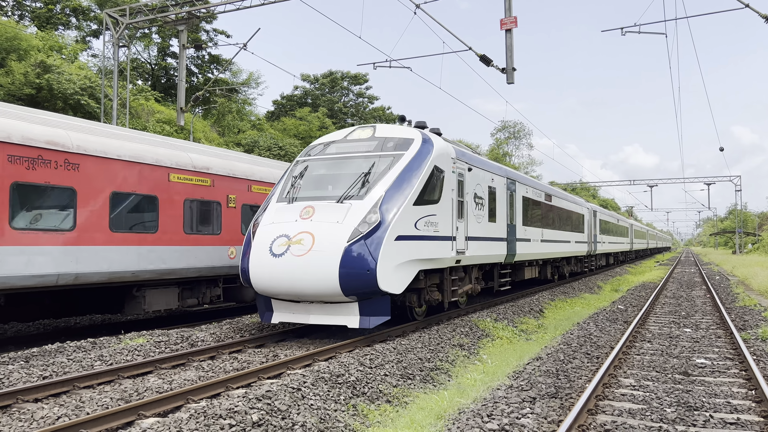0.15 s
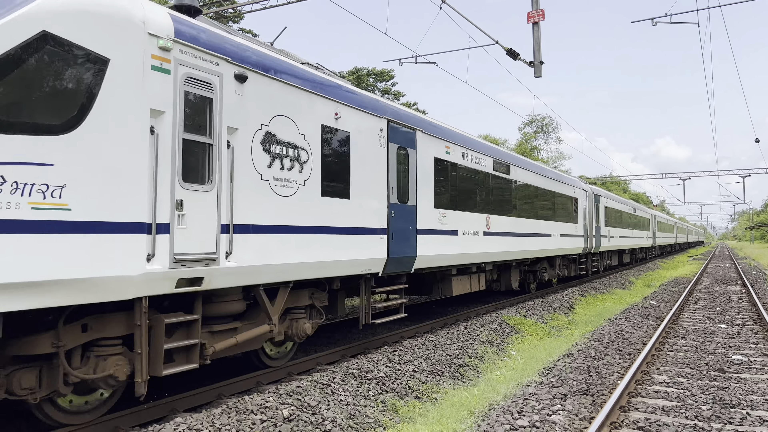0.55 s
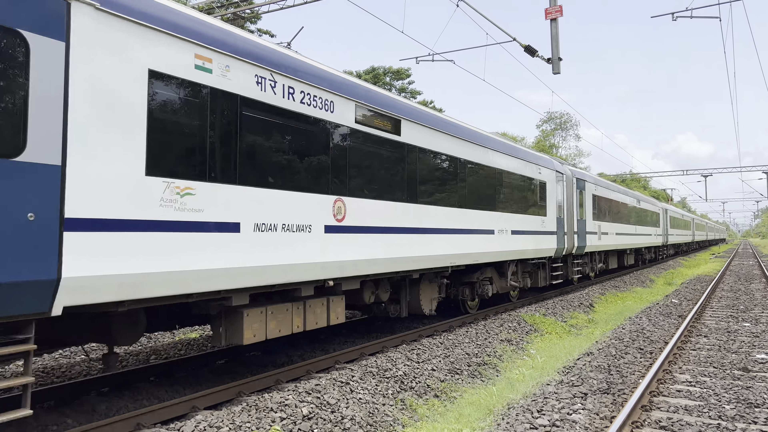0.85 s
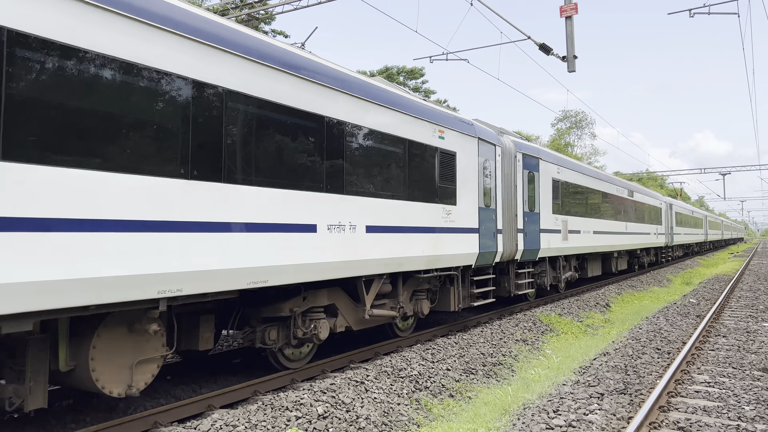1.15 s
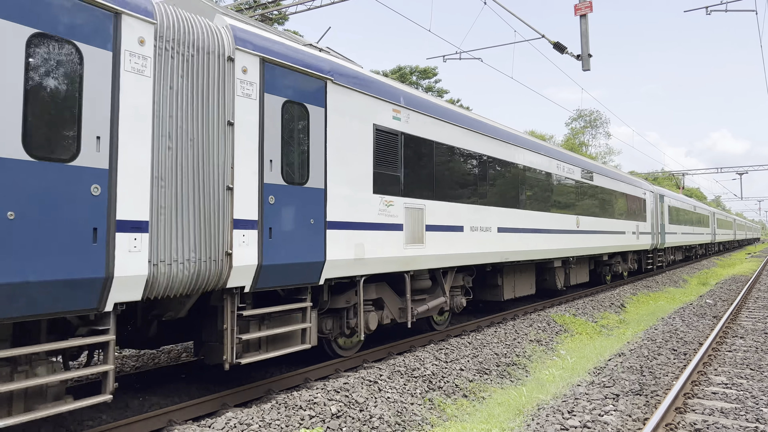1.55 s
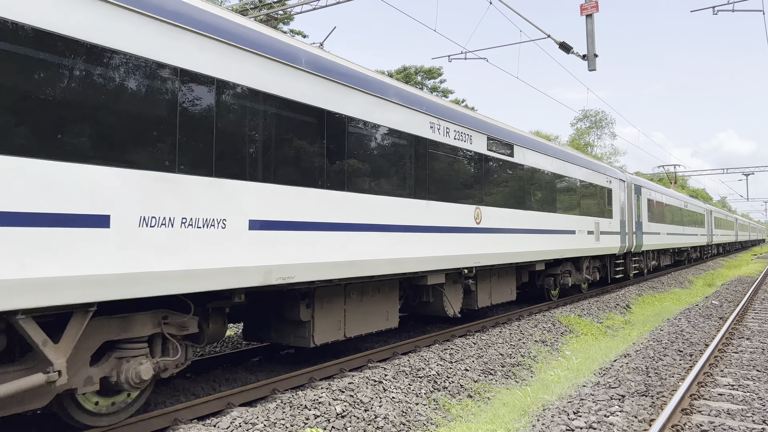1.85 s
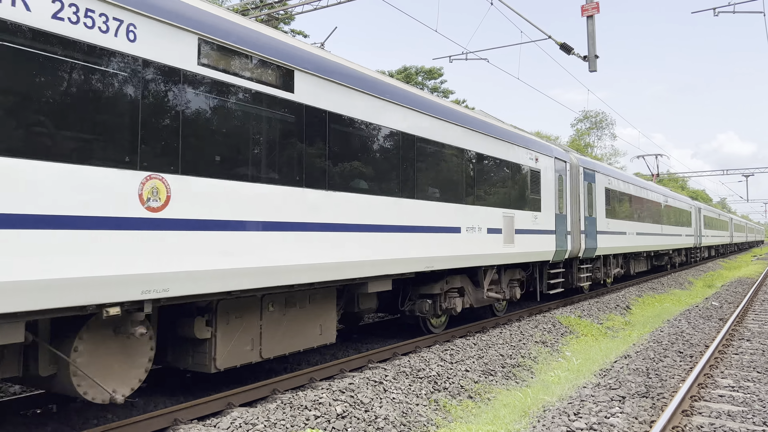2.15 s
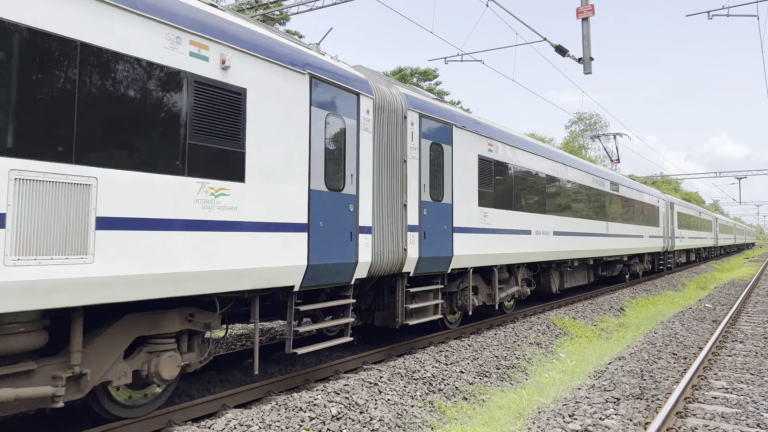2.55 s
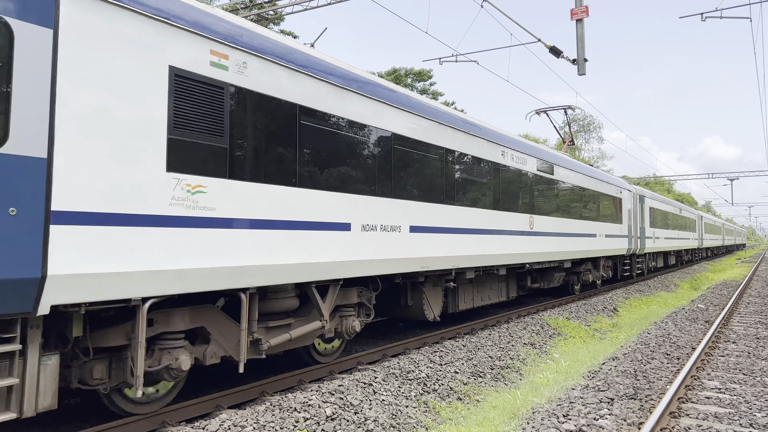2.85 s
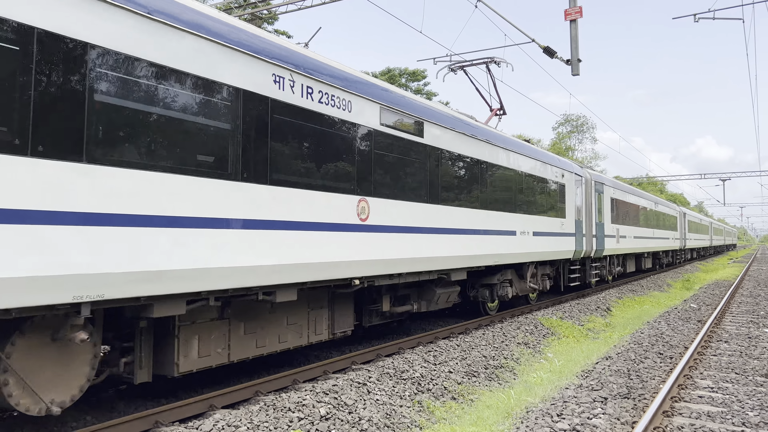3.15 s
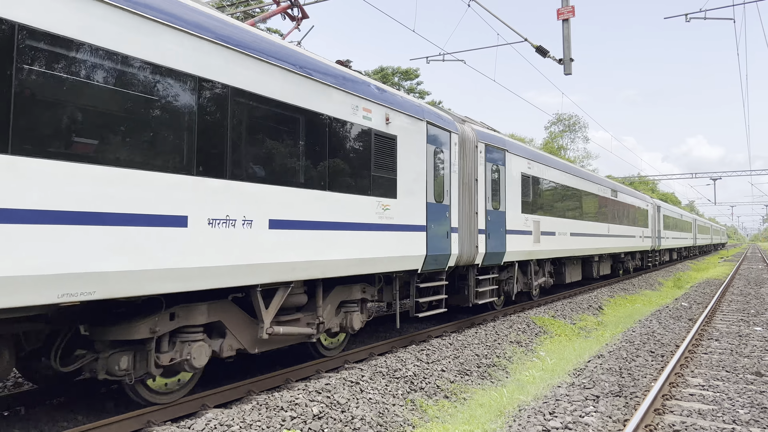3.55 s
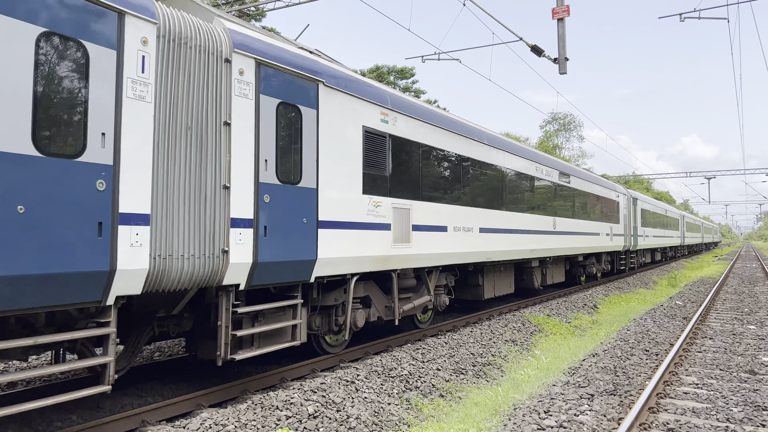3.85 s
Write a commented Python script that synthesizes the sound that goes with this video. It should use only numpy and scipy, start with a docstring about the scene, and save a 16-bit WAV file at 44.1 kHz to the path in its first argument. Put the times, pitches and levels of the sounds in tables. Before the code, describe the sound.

A fast passenger train sweeps by at trackside, rumbling and roaring with sharp repeated double wheel clacks

```python
"""An electric express rushes past a few metres from a phone on the ballast: wheels roar, coaches rumble.
Rolling sound is shaped, patchy noise. Each axle thuds over a rail joint (damped modes, noise bursts),
then clacks on a second gap, which sets the steel wheel ringing. Bogies sweep by as falling chirps.
Behind lie thin squeaks, knocks and ringing down the rails, a low two-tone drone and wavering hums.
The sound comes from the left and reaches the left microphone first."""
import sys
import numpy as np
from scipy import signal
from scipy.fft import rfft, irfft, next_fast_len
from scipy.io import wavfile
from scipy.ndimage import uniform_filter1d, map_coordinates

SR = 44100
rng = np.random.default_rng(int(sys.argv[2]) if len(sys.argv) > 2 else 0)


def store_pcm(level_fs):
    """Save levels as 16-bit WAV."""
    pcm = np.round(np.clip(level_fs, -1, 1) * 32767).astype(np.int16)
    wavfile.write(sys.argv[1], SR, np.atleast_2d(pcm).T)


N = 176400

# Train drawing level. Each row: time in s, then nominal rumble, roar and hiss levels in dB.
PASS_LEVELS = [(0, -52, -44.5, -56.5), (.38, -50, -41.5, -51), (.5, -43, -36.5, -47),
               (.75, -35, -34, -40.5), (1.15, -33, -32.5, -40.5), (1.4, -35, -28.5, -38.5),
               (1.85, -31, -31, -36), (2.35, -31, -28, -38), (2.55, -33.5, -28.5, -37.5),
               (2.85, -29.5, -26.5, -35.5), (3.02, -32, -31, -37), (3.25, -29, -30.5, -37),
               (3.52, -31.5, -30.5, -39.5), (3.75, -33.5, -27.5, -36.5), (4, -30, -28.5, -34)]
# Noise spectra of the rolling train. Each row: frequency in Hz, relative level in dB.
RUMBLE_SPECTRUM = [(25, -56), (42, -19), (52, -9), (62, -4), (76, -5), (95, -8.5), (120, -11.5), (160, -18),
                   (300, -79)]
ROAR_SPECTRUM = [(50, -58), (120, -10), (200, -2), (300, -2.5), (400, -2.5), (520, -5.5), (760, -1.5),
                 (1000, -2), (1300, -11.5), (1800, -20.5), (4000, -53)]
HISS_SPECTRUM = [(600, -28), (1150, -4), (1400, -3.5), (1700, -2), (2500, -2), (3100, -9), (4000, -11),
                 (4900, -5.5), (5400, -15.5), (6200, -11), (7500, -20.5), (9000, -15), (10300, -33.5),
                 (11700, -21.5), (15000, -30.5)]
# Axles at the joint. Each row: time in s, then base levels in dB of thud, crack,
# snap at the second gap, clatter, wheel ring.
AXLES = [(.7965, -11, -22, -20.5, -21.5, -35), (.926, -11.5, -25, -17, -23, -37),
         (1.512, -8, -18, -14, -19.5, -52), (1.6417, -9, -19.5, -15.5, -19, -42),
         (1.9504, -9, -19.5, -19, -20, -24), (2.0795, -7.5, -19.5, -10, -20.5, -29.5),
         (2.667, -9.5, -21, -15.5, -19, -30), (2.7976, -9.5, -21, -13, -24, -31),
         (3.106, -7.5, -17, -17.5, -20, -36), (3.236, -6.5, -18, -12, -19.5, -29),
         (3.8259, -6.5, -17.5, -18.5, -17, -28.5), (3.9553, -6, -18, -14, -19, -37)]
# Track and bogie under a blow. Each row: frequency in Hz, relative level in dB, T60 in s.
THUD_MODES = [(244, -13.5, 0.052), (456.4, -16.5, 0.091), (577, -9.5, 0.051), (733.6, 5, 0.043),
              (917, -9.5, 0.071), (1718, -13.5, 0.097), (2402, -15.5, 0.06), (4920, -28, 0.068),
              (5845, -10.5, 0.021)]
# Steel wheel. Each row: frequency in Hz, relative level in dB, T60 in s.
WHEEL_MODES = [(1561, 5, .11), (1647, 2, .09), (3208, -5, .11), (3355, -3, .11), (6180, -6, .14),
               (6836, -2, .2), (8535, -14, .2), (8988, -13, .2), (9055, -11, .2), (12295, -23, .2),
               (13555, -20, .2)]
# Noise spectra of the blows. Each row: frequency in Hz, relative level in dB.
CRACK_SPECTRUM = [(120, -0.5), (400, 3.5), (720, 2.5), (950, 6.5), (1300, -5), (1750, 3), (2400, -4.5),
                  (3200, -8.5), (4800, -9), (6000, -10.5), (7200, -21), (9000, -19.5), (10300, -30),
                  (12000, -29), (15000, -45)]
SNAP_SPECTRUM = [(300, 2), (1300, -4), (2300, 5.5), (3100, -8), (6000, -5.5), (7500, -23), (15000, -51.5)]
CLATTER_SPECTRUM = [(120, -13), (330, 2.5), (1250, -1), (1700, 2), (2400, -7), (3200, -10), (6100, -12.5),
                    (7500, -23), (9000, -13.5), (10300, -52), (15000, -47)]
# Squeaks. Each row: centre time in s, bell width (sigma) in s, level in dB.
SQUEAKS = [(0.112, 0.016, -55), (0.245, 0.03, -52), (.648, 0.012, -44), (3.8, .015, -35)]
# Leading wheels knocking further up the line. Each row: time in s, base level in dB.
FAR_KNOCKS = [(0.433, -35.5), (.472, -30), (0.576, -34.5), (0.614, -26.5)]
# Noise spectrum carried by the rails. Each row: frequency in Hz, relative level in dB.
FAR_SPECTRUM = [(150, -34), (500, -1), (900, 12.5), (1400, 2), (2300, -9.5), (6000, -25), (10000, -50)]
# Low drone before the wheels arrive. Each row: frequency in Hz, level in dB.
DRONE_TONES = [(60.5, -42), (86, -44)]
# Correlation between the microphones. Each row: frequency in Hz, correlation 0-1.
ROLL_CORRELATION = [(60, 0.97), (250, 1), (800, 0.77), (1400, 0.48), (2400, 0.62), (5000, 0.4),
                    (14000, 0.31)]
HIT_CORRELATION = [(200, 1), (2400, 0.75), (5000, 0.38), (14000, 0.96)]
# Phase lead of the left microphone. Each row: frequency in Hz, lead in radians.
LEFT_LEAD = [(30, 0), (250, 0.48), (500, 1.18), (750, 1.91), (1050, 2.3), (1400, 3.1), (2000, 4.59),
             (2500, 6.2), (3200, 9.4), (4500, 13.25), (5900, 17.9), (7200, 24.9), (8800, 28.76),
             (13000, 25.3)]
# Level of left over right. Each row: frequency in Hz, difference in dB.
LEFT_OVER_RIGHT = [(100, 0), (480, -1.5), (750, 3), (1200, 1), (2200, -3.5), (3100, 1.5), (4000, 8.5),
                   (5600, 7.5), (7000, -0.5), (8500, 2.5), (11000, 0)]

SECOND_GAP_S = .0585  # travel time from joint to second gap
CRACK_OFFSET_DB, RATTLE_OFFSET_DB = 6.5, -1.5  # added to the crack base level
SPLASH_RANGE_HZ, SPLASH_T60_S, SPLASH_DB = (10950, 15200), 0.17, -36.5  # dB relative to the blow
WHOOM_LEAD_S, WHOOM_WIDTH_S, WHOOM_DB = .11, 0.017, -19  # dB relative to the thud
WHOOM_HZ, WHOOM_FALL_HZ_PER_S = 230.8, 550
SQUEAK_HZ, SQUEAK_FALL_HZ_PER_S = 4910, 590
DRONE_FADE_S, RAILS_AHEAD_DB = 0.83, -47.5
NOSE_HUM_HZ, NOSE_HUM_DB = 204.6, -47
COACH_HUM_HZ, COACH_HUM_DB = 296.8, -38.5
BASS_CUT_HZ, TOP_HZ = 37, 15700


def rolling():
    """Coach rumble, wheel roar and gritty rail hiss: shaped noise that grows as the train draws level."""
    time_s, *columns = np.transpose(PASS_LEVELS)
    rumble_db, roar_db, hiss_db = [np.interp(np.arange(N) / SR, time_s, c) for c in columns]

    rumble = rush(RUMBLE_SPECTRUM, ROLL_CORRELATION, patchy_db=2)
    running_rms = np.sqrt(np.abs(uniform_filter1d((rumble ** 2).mean(0), size=5500)))
    rumble = amp(rumble_db) * rumble / np.sqrt(running_rms)  # square root: evens the lumps only in part

    roar_gain = amp(roar_db + 0.39 * wobble(24.85))
    roar = roar_gain * rush(ROAR_SPECTRUM, ROLL_CORRELATION, patchy_db=1.4)

    grit = unit_rms(amp(1.8 * wobble(400)))
    hiss_gain = amp(hiss_db + 1.24 * wobble(29.57)) * grit
    hiss = hiss_gain * rush(HISS_SPECTRUM, ROLL_CORRELATION, patchy_db=1.5)
    return rumble + roar + hiss


def joint():
    """A wheel drops into the joint: modal thud under a bright noise crack with a short rattling tail."""
    time_s, thud_db, crack_db, *_ = np.transpose(AXLES)
    thud = ring(THUD_MODES, time_s, thud_db, attack_s=0.002, detune=0.012, scatter_db=.7,
                phase_spread=0.2)
    crack = strikes(time_s, crack_db + CRACK_OFFSET_DB, attack_s=0.00092, t60_s=0.044)
    rattle = strikes(time_s, crack_db + RATTLE_OFFSET_DB, attack_s=0.0072, t60_s=0.28)
    rattle = rattle * amp(0.75 * wobble(220))
    noise = rush(CRACK_SPECTRUM, HIT_CORRELATION, patchy_db=4.0)
    return thud + (crack + rattle) * noise + splash(time_s, crack_db)


def second_gap():
    """A snap and a long uneven clatter; the wheel rings on roughly, differently at each microphone."""
    time_s, _, _, snap_db, clatter_db, ring_db = np.transpose(AXLES)
    time_s = time_s + SECOND_GAP_S

    snap = strikes(time_s, snap_db, attack_s=0.0015, t60_s=0.047)
    snap = snap * rush(SNAP_SPECTRUM, HIT_CORRELATION, patchy_db=3)

    clatter = strikes(time_s, clatter_db, attack_s=0.0089, t60_s=0.32) * amp(1.8 * wobble(200))
    clatter = clatter * rush(CLATTER_SPECTRUM, HIT_CORRELATION, patchy_db=1.5)

    wheel = np.array([ring(WHEEL_MODES, time_s, ring_db, attack_s=0.008, detune=0.0011,
                           scatter_db=3.5, phase_spread=np.pi) for _ in range(2)])
    judder = unit_rms(amp(3 * wobble(500)))
    return snap + clatter + judder * (wheel + splash(time_s, clatter_db))


def splash(times_s, levels_db):
    """The crowded top modes of a wheel, at random pitches, flash up at a blow."""
    modes = [(hz, SPLASH_DB, SPLASH_T60_S) for hz in rng.uniform(*SPLASH_RANGE_HZ, size=14)]
    return ring(modes, times_s, levels_db, attack_s=0.0042, detune=0, scatter_db=5, phase_spread=np.pi)


def bogies():
    """Each bogie sweeps by just before the joint: a short falling swell, scaled with its first thud."""
    total = np.zeros(N)
    for time_s, thud_db, *_ in AXLES[::2]:  # first axle of each bogie
        whoom = chirp(time_s - WHOOM_LEAD_S, WHOOM_WIDTH_S, WHOOM_HZ, WHOOM_FALL_HZ_PER_S,
                      waver_hz=60.15, knots_per_s=250)
        total += amp(thud_db + WHOOM_DB) * whoom
    return total


def squeaks():
    """Thin, unsteady, sagging squeaks, perhaps a wheel singing on the rail."""
    total = np.zeros(N)
    for time_s, width_s, level_db in SQUEAKS:
        squeak = chirp(time_s, width_s, SQUEAK_HZ, SQUEAK_FALL_HZ_PER_S, waver_hz=49.7, knots_per_s=400)
        total += amp(level_db) * squeak
    return total


def approach():
    """Two low tones fade out while faint ringing and dull knocks, as noise, run down the rails."""
    time_s, level_db = np.transpose(FAR_KNOCKS)
    fade = swell(0, DRONE_FADE_S)
    knocks = strikes(time_s, level_db + 5, attack_s=0.0025, t60_s=0.073)
    tails = strikes(time_s, level_db - 8, attack_s=0.0091, t60_s=0.59)
    rails_gain = knocks + tails + amp(RAILS_AHEAD_DB) * fade
    rails = rails_gain * rush(FAR_SPECTRUM, HIT_CORRELATION, patchy_db=0.0)
    drone = sum(hum(hz, db, waver_db=0.0) for hz, db in DRONE_TONES)
    return rails + fade * drone


def machines():
    """One hum arrives with the nose; a higher, broken one passes with the coaches."""
    nose = swell(0.31, 0.099) * hum(NOSE_HUM_HZ, NOSE_HUM_DB, waver_db=-1.5)
    flutter = np.clip(1 + .5 * wobble(34.97), 0, 2)
    coaches = swell(2.17, 0.72) * flutter * hum(COACH_HUM_HZ, COACH_HUM_DB, waver_db=0)
    return nose + coaches


def hum(hz, level_db, waver_db):
    """A sine that wavers in pitch and, if waver_db is not 0, in level."""
    pitch_hz = hz * (1 + 0.0148 * wobble(14))
    return amp(level_db + waver_db * wobble(11)) * np.sin(2 * np.pi * np.cumsum(pitch_hz) / SR)


def chirp(centre_s, width_s, hz, fall_hz_per_s, waver_hz, knots_per_s):
    """A short swell on an unsteady, falling pitch."""
    pitch_hz = hz - fall_hz_per_s * (np.arange(N) / SR - centre_s) + waver_hz * wobble(knots_per_s)
    return swell(centre_s, width_s) * np.sin(2 * np.pi * np.cumsum(pitch_hz) / SR)


def ring(modes, times_s, levels_db, attack_s, detune, scatter_db, phase_spread):
    """Damped modes struck at the given times, with random tuning, level and phase at each blow."""
    out = np.zeros(N + SR)
    t = np.arange(SR // 3) / SR
    hz, mode_db, t60_s = np.transpose(modes)[:, :, None]
    attack = 1 - np.exp(-(t / attack_s) ** 2)
    decay = np.exp(-np.log(1000) * t / t60_s)
    for time_s, level_db in zip(times_s, levels_db):
        tune, size, phase = rng.standard_normal((3, len(modes), 1))
        gain = amp(level_db + mode_db + scatter_db * size)
        angle = 2 * np.pi * hz * (1 + detune * tune) * t + phase_spread * phase
        partials = gain * decay * np.sin(angle)
        out[round(time_s * SR):][:len(t)] += partials.sum(0) * attack
    return out[:N]


def strikes(times_s, levels_db, attack_s, t60_s):
    """Envelope of blows that rise fast and die away, summed in power."""
    age_s = np.maximum(np.arange(N) / SR - np.asarray(times_s)[:, None], 0)
    rise = 1 - np.exp(-age_s / attack_s)
    each = amp(levels_db)[:, None] * rise * np.exp(-np.log(1000) * age_s / t60_s)
    return np.sqrt((each ** 2).sum(0))


def rush(spectrum, correlation, patchy_db):
    """Stereo noise of rms 1: random gain patches in time and frequency, set spectrum and correlation."""
    bins = signal.stft(rng.standard_normal((2, N)), nperseg=512)[2]
    patches = uniform_filter1d(rng.standard_normal(bins.shape[1:]), size=4, axis=0)
    patches = uniform_filter1d(patches, size=10, axis=1)
    pair = signal.istft(bins * amp(patchy_db * unit_rms(patches)), nperseg=512)[1][:, :N]

    def mid_side_response(hz):
        angle = np.arccos(np.clip(along(correlation, hz), -1, 1)) / 2
        return amp(along(spectrum, hz)) * np.array([np.cos(angle), np.sin(angle)])
    mid, side = filtered(pair, mid_side_response)
    return unit_rms(np.array([mid + side, mid - side]))


def swell(centre_s, width_s):
    """A bell-shaped rise and fall."""
    return np.exp(-.5 * ((np.arange(N) / SR - centre_s) / width_s) ** 2)


def wobble(knots_per_s):
    """A smooth random curve through normal-distributed knots."""
    knots = rng.standard_normal(int(N * knots_per_s / SR) + 4)
    return map_coordinates(knots, [np.arange(N) * knots_per_s / SR])


def filtered(x, response):
    """x filtered by a response given as a function of Hz."""
    size = next_fast_len(N + SR // 2)
    return irfft(rfft(x, size) * response(np.fft.rfftfreq(size, 1 / SR)), size)[..., :N]


def along(points, hz):
    """Interpolates (Hz, value) points on a log frequency axis."""
    point_hz, value = np.transpose(points)
    return np.interp(np.log(hz + 1), np.log(point_hz + 1), value)


def amp(db):
    """Decibels to amplitude."""
    return 10 ** (np.asarray(db) / 20)


def unit_rms(x):
    """Scales to rms 1."""
    return x / np.sqrt(np.mean(x ** 2) + 1e-20)


def scene():
    """Sums the sources; all lead in phase at the left, with a left-right level difference by frequency."""
    train = rolling() + joint() + second_gap() + bogies() + squeaks() + approach() + machines()
    sides = np.array([[.5], [-.5]])  # left, right

    def microphones(hz):
        gain = amp(sides * along(LEFT_OVER_RIGHT, hz))
        gain = gain / np.sqrt((gain ** 2).mean(0))  # mean power unchanged
        return gain * np.exp(1j * sides * along(LEFT_LEAD, hz))
    return filtered(train, microphones)


def record(dry):
    """The deepest bass is cut away, and the phone keeps nothing above its band limit."""
    bass_cut = signal.butter(N=6, Wn=BASS_CUT_HZ, btype="highpass", fs=SR, output="sos")
    return filtered(signal.sosfilt(bass_cut, dry), lambda hz: hz < TOP_HZ)


dry = scene()
out = record(dry)
store_pcm(out)
```